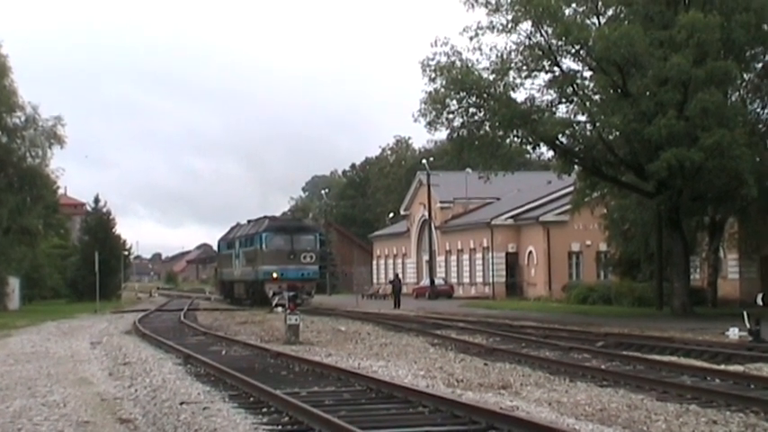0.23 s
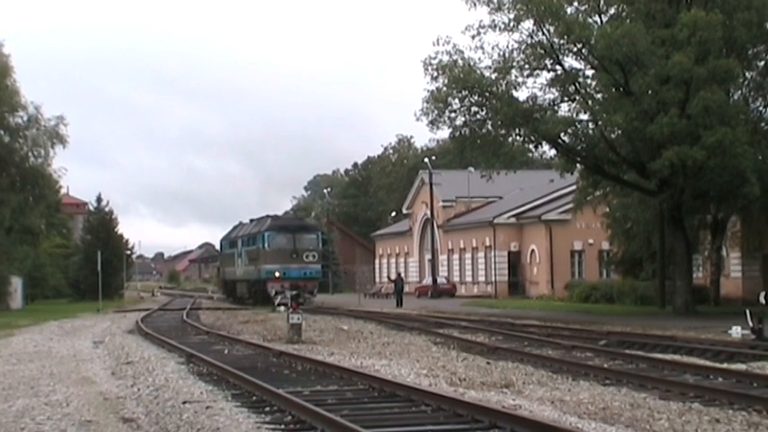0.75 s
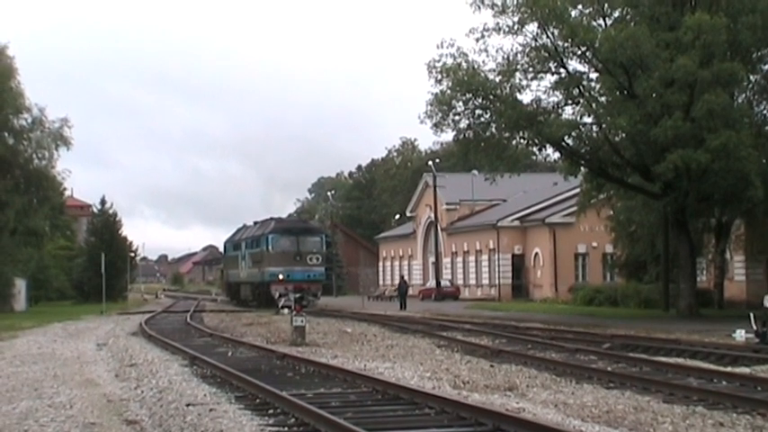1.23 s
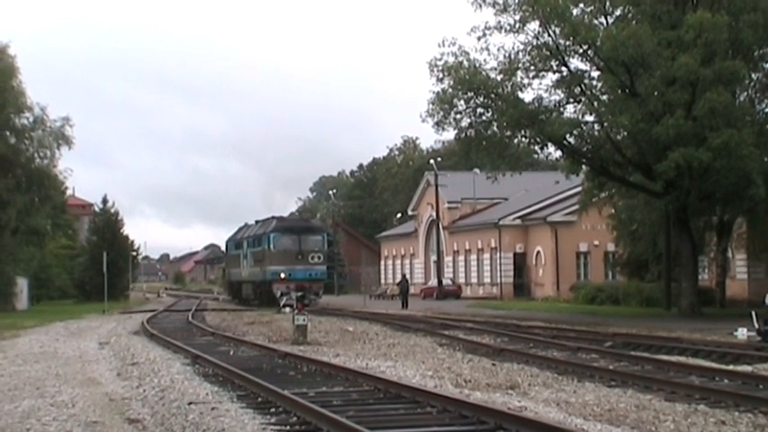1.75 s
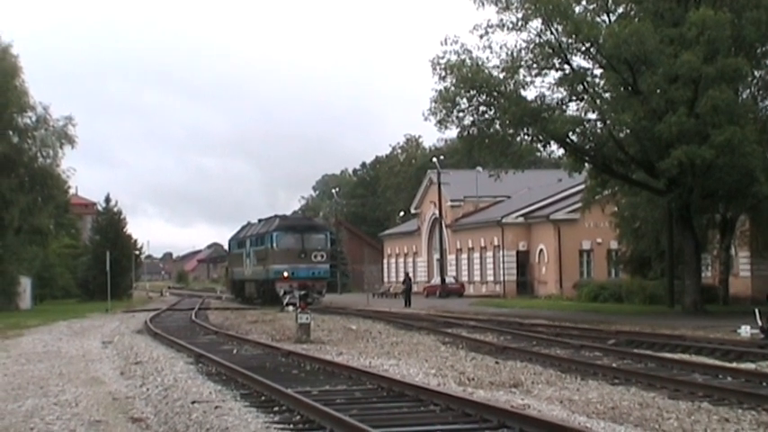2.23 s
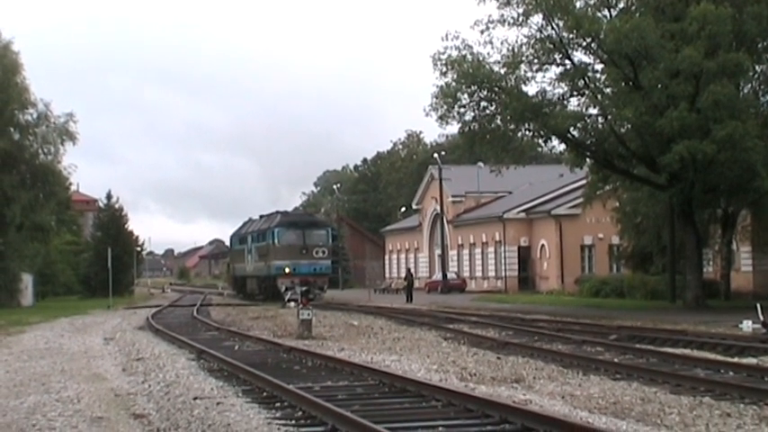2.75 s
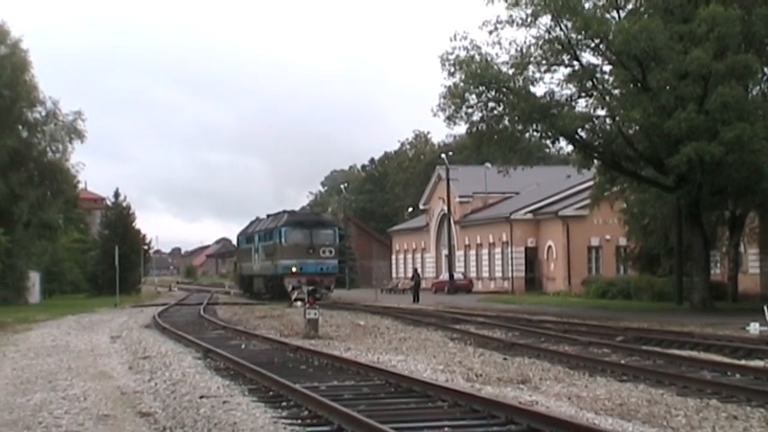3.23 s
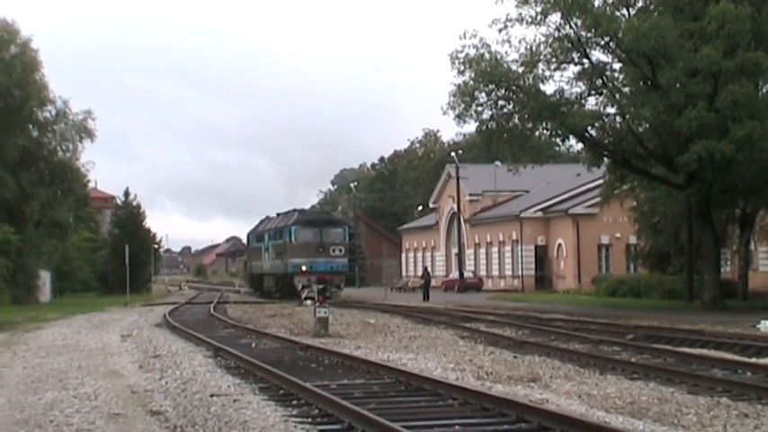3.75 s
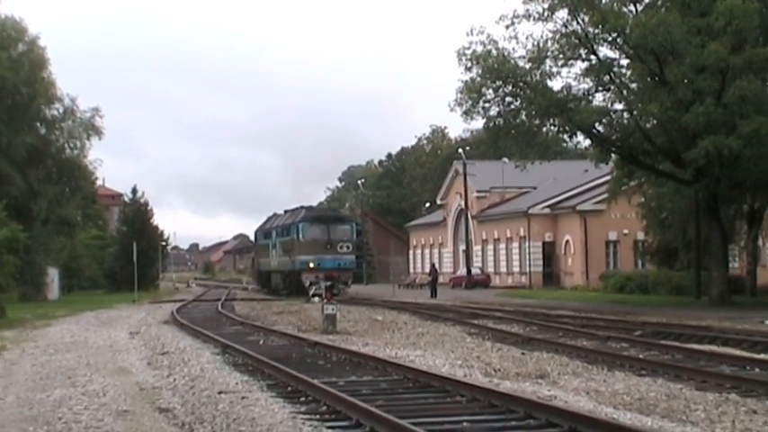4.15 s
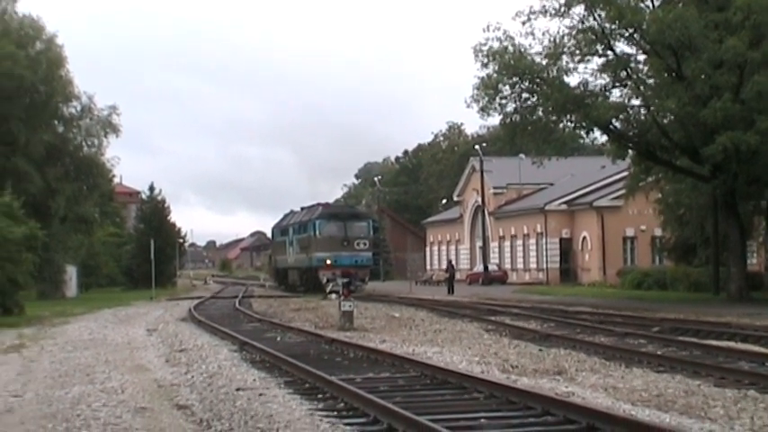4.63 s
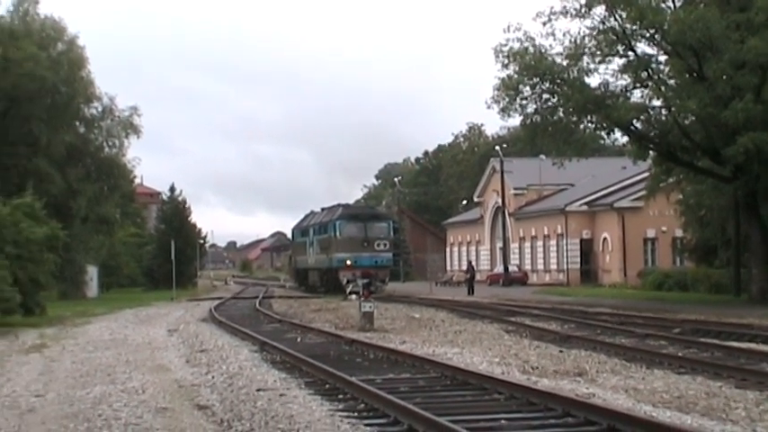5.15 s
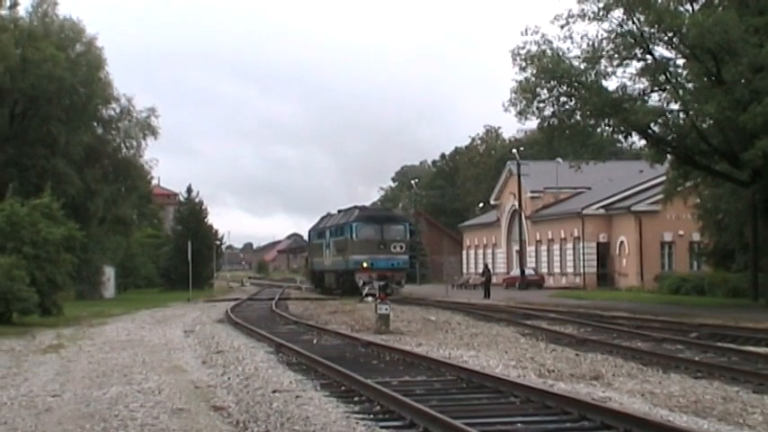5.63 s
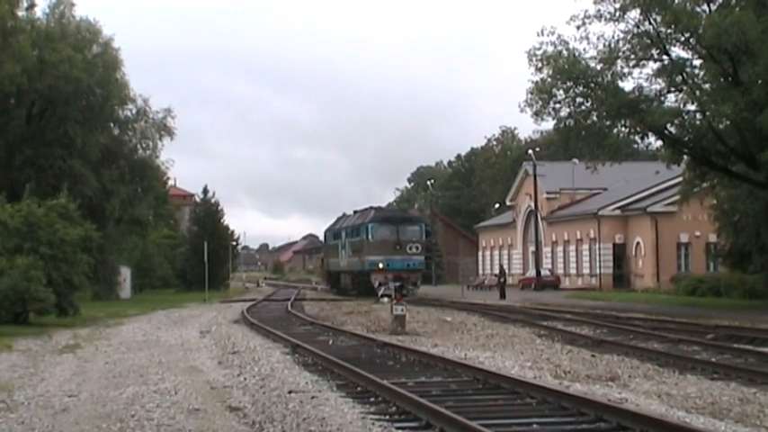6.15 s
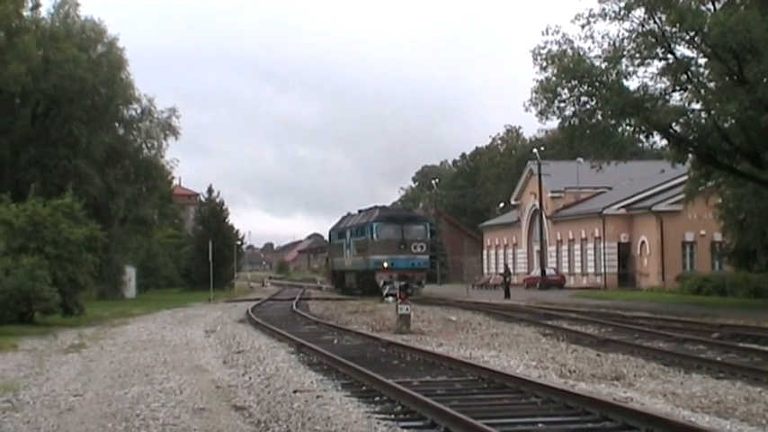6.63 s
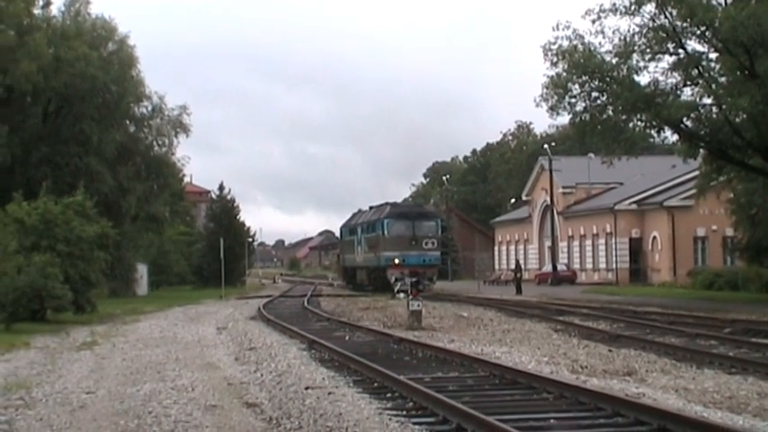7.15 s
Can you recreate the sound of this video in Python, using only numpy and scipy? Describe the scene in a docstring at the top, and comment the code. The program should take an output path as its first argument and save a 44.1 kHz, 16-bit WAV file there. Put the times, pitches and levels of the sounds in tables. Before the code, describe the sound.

A diesel locomotive idles with an uneven low throb while brake air bursts out in a loud roar, thins to a singing hiss and fades.

```python
"""Diesel train braking at a station

A sixteen-cylinder diesel locomotive idles as it rolls slowly into a country station, some way from a camcorder.
A brake valve opens: air, made of coloured noise and wavering tones, roars, sings in its pipe and fades.
Unequal pulses make the engine, gliding sines its fan, its blower and the faint squeaks of the brakes.
The camcorder adds motor whine and hiss, wind puffs add soft bumps, and the bass is spread wide.
The level dips for an instant at about 4.4 s."""
import sys
import numpy as np
from scipy import signal
from scipy.fft import rfft, irfft, next_fast_len
from scipy.io import wavfile

SR = 44100
rng = np.random.default_rng(int(sys.argv[2]) if len(sys.argv) > 2 else 0)


def unload_audio(sound):
    """Save the sound as a 16-bit wav file, at the path given as the first command line argument."""
    columns = np.transpose(np.atleast_2d(sound))
    # keep every value between -1 and 1, then stretch to whole-number steps
    steps = np.round(np.clip(columns, -1, 1) * 32767)
    wavfile.write(sys.argv[1], SR, steps.astype(np.int16))


N = 326222
T = np.arange(N) / SR
SIZE = next_fast_len(N, True)
FREQS = np.arange(SIZE // 2 + 1) * SR / SIZE


def undb(db):
    """Amplitude gain is ten to the power of decibels over twenty."""
    return 10 ** (np.asarray(db) / 20)


def unit(x):
    """Normalisation: scale to rms 1."""
    return x / np.sqrt(np.mean(x ** 2))


def curves(table):
    """Linear interpolation: the columns of a time table as signals."""
    seconds, *columns = np.transpose(table)
    return [np.interp(T, seconds, column) for column in columns]


def colour(points):
    """Spectral envelope: gain at every frequency, dB joined by straight lines over log frequency."""
    hz, db = np.transpose(points)
    return undb(np.interp(np.log(FREQS + 1), np.log(hz), db))


def band(points):
    """Band limiting: a colour that falls away beyond its first and last point."""
    below = (points[0][0] / (FREQS + 1) / 2) ** 4
    above = (FREQS / points[-1][0] / 2) ** 4
    return colour(points) / np.sqrt(1 + below + above)


def filtered(x, gain):
    """Linear filtering: multiply the spectrum by a gain per frequency."""
    return irfft(rfft(x, SIZE) * gain, SIZE)[:N]


def noise(gain):
    """Filtered white noise of the given colour, rms 1."""
    return unit(filtered(rng.standard_normal(N), gain))


def walk(rate_hz):
    """Low-pass random fluctuation, rms 1."""
    return noise(np.exp(-(FREQS / rate_hz) ** 2))


def swell(start, length):
    """Half-sine envelope: a smooth rise and fall."""
    return np.sin(np.pi * np.clip((T - start) / length, 0, 1))


def sweep(hz):
    """Phase in radians is the running integral of frequency."""
    return 2 * np.pi * np.cumsum(hz) / SR


VALVE_OPENS_S = 1.23
# the valve stays just cracked, then opens fully; each hold rounds off into its fall over the knee
CRACKED_S, OPENING_S, KNEE_S = 0.21, 0.2, 0.48


def air_level(db, cracked_db, hold_s, fall_db_per_s):
    """Reservoir discharge: the level steps up as the valve opens fully, holds, then falls steadily in dB."""
    age = T - VALVE_OPENS_S
    opening = np.clip((age - CRACKED_S) / OPENING_S, 0, 1)
    draining_s = KNEE_S * np.logaddexp(0, (age - hold_s) / KNEE_S)
    return db + cracked_db * (1 - opening) - fall_db_per_s * draining_s


def underframe(x, t60=0.15, echo_db=-10):
    """Comb-like interference: short reflections between frame and track ripple the spectrum finely."""
    echoes = rng.standard_normal(N) * np.exp(-np.log(1000) * T / t60)
    echoes = echoes / np.linalg.norm(echoes)
    return filtered(x, 1 + undb(echo_db) * rfft(echoes, SIZE))


PRESSURE_LOW_S = 4.6
SPENDING_CURVE = 1.55  # above 1, the full-pressure colour lingers before it gives way
# The slowing flow passes through the range where the pipe sings best.
BEST_SONG_START_S, BEST_SONG_LENGTH_S, BEST_SONG_DB = 4.85, 2.9, 2.5
# Levels of the three parts of the escaping air. Each holds: level in dB,
# change while the valve is only cracked in dB, hold in seconds, fall in dB per second.
ROAR_DISCHARGE = (-30.5, -2, 1.67, 7)
SONG_DISCHARGE = (-38, -2, 0.5, 1.46)
JET_DISCHARGE = (-37, -3.5, 3, 4)
# Colours of the same parts. Each row: frequency in Hz, relative density in dB per Hz.
ROAR_COLOUR = [(130, -29), (215, -8.5), (265, -44), (340, -3.5), (430, -44), (500, -10), (600, -4.5),
               (800, -1.5), (1050, -2), (1300, -1), (1520, -3), (1750, -4), (2100, -6), (2700, -13.5),
               (3900, -11), (6000, -48)]
SONG_COLOUR = [(1100, -19), (1500, -9), (1750, 1.5), (2000, -4), (2450, -6.5), (2600, -16.5), (3200, -25),
               (4000, -18)]
JET_COLOUR = [(2500, -21), (3600, -5), (4100, 0.5), (4300, 1.5), (4700, 2), (5500, 2.5), (6600, 1.5),
              (7700, -1.5), (8600, -2.5), (9800, -9.5), (11700, -16)]
# Tilt of each colour. Each holds: dB per octave at full pressure, dB per octave at low pressure.
ROAR_SLOPE = (1, -3)
SONG_SLOPE = (0.19, -0.1)
JET_SLOPE = (-2.1, -0.042)
# Resonances and notches of the vent pipe. Each row: frequency in Hz, width in Hz,
# lift at full pressure in dB, lift at low pressure in dB.
PIPE_MODES = [(625, 50, 3.5, 8), (790, 50, 1, 5), (900, 46, 5, 9), (989, 22, 2, 5), (1065, 90, 4.5, 2.5),
              (1176, 44, 3.5, 4), (1290, 60, 4, 3), (1522, 30, -2, 7), (1643, 34, 3, 9), (1695, 54, 2.5, 6),
              (1740, 18, 4.5, 8.5), (1824, 34, 3.5, 7), (1855, 28, 5, 7), (1960, 40, 1.5, 4.5),
              (2164, 44, 3.5, 1.5), (2280, 80, 3.5, 2), (2450, 110, -2, 3), (2800, 110, 5.5, -3),
              (3185, 90, 2.5, 11.5), (4135, 110, 1.5, 6.5), (4255, 80, -2, -4.5), (4522, 50, 2.5, 7),
              (4608, 26, 0, 8), (4856, 36, 4, 7), (5060, 110, 1.5, 4)]


def brake_air(flutter_db=0.5, drift_db=0.5):
    """Turbulent flow noise in a resonant pipe: falling pressure dulls the roar and rings the hiss."""
    early_pipe_db, late_pipe_db = 0, 0
    for hz, width, early_db, late_db in PIPE_MODES:
        peak = 1 / (1 + np.abs(2 * (FREQS - hz) / width) ** 4)
        early_pipe_db = early_pipe_db + early_db * peak
        late_pipe_db = late_pipe_db + late_db * peak
    octaves = np.log2(np.maximum(FREQS / PIPE_MODES[0][0], 1))  # above the lowest resonance
    spent = np.interp(T, [VALVE_OPENS_S, PRESSURE_LOW_S], [0, 1]) ** SPENDING_CURVE
    song_peak_db = BEST_SONG_DB * swell(BEST_SONG_START_S, BEST_SONG_LENGTH_S)
    parts = (
        (ROAR_COLOUR, air_level(*ROAR_DISCHARGE), ROAR_SLOPE),
        (SONG_COLOUR, air_level(*SONG_DISCHARGE) + song_peak_db, SONG_SLOPE),
        (JET_COLOUR, air_level(*JET_DISCHARGE), JET_SLOPE),
    )
    air = 0
    for shape, db, (early_slope, late_slope) in parts:
        fast = noise(band(shape) * undb(early_pipe_db + early_slope * octaves))
        slow = noise(band(shape) * undb(late_pipe_db + late_slope * octaves))
        blend = np.sqrt(1 - spent) * fast + np.sqrt(spent) * slow  # constant power
        air = air + blend * undb(db + drift_db * walk(3.7))
    valve = np.clip((T - VALVE_OPENS_S) / 0.005, 0, 1)
    return underframe(valve * air * undb(flutter_db * walk(36)))


def first_gush(db=-35, peak_s=0.046, low_hz=85, high_hz=270):
    """Pressure transient: the first slug of air leaves the valve with a dull whump."""
    age = np.maximum(T - VALVE_OPENS_S, 0) / peak_s
    low_cut = 1 + (low_hz / (FREQS + 1)) ** 8
    high_cut = 1 + (FREQS / high_hz) ** 6
    return undb(db) * age * np.exp(1 - age) * noise(1 / np.sqrt(low_cut * high_cut))


# Hollow core of the roar. Each row: time in seconds, frequency in Hz, level in dB rms.
HOWL_PATH = [(1.3, 1150, -41), (1.9, 1110, -39), (2.25, 1110, -38), (2.62, 1000, -43), (2.95, 940, -42),
             (4.6, 800, -57)]


def howl(spread_hz=150):
    """Narrow-band noise by modulation: a random envelope on a tone that sinks as the pressure falls."""
    hz, db = curves(HOWL_PATH)
    core = np.sqrt(2) * undb(db) * walk(spread_hz) * np.sin(sweep(hz))
    return (T > VALVE_OPENS_S) * core


# Whistles of the pipe. Each row: start in seconds, length in seconds, frequency in Hz, typical peak in dB.
PIPE_WHISTLES = [(5.1, 2.9, 1739, -48), (5.15, 1.8, 1823, -49), (5.3, 2.3, 1647, -49),
                 (5.5, 1.3, 1717, -49), (5.5, .35, 4150, -51), (5.7, 1.3, 1852, -49), (5.7, 1.2, 4100, -54),
                 (6.1, 1.1, 4608, -54)]


def whistles(waver=0.00201, flicker_db=1.5):
    """Flow-resonance lock-in: the weakening flow locks onto single resonances of the pipe for a while."""
    out = 0
    for start, length, hz, db in PIPE_WHISTLES:
        angle = sweep(hz * (1 + waver * walk(25.5)))
        out = out + swell(start, length) * undb(db + flicker_db * walk(10)) * np.sin(angle)
    return out


FIRST_THUMP_S = 0.188
EASING_DB_PER_S = 0.34  # the exhaust softens as the train slows
# Engine speed. Each row: time in seconds, four-stroke cycles per second.
ENGINE_SPEED = [(0, 2.885), (2.6, 2.89), (3.7, 2.975), (4.4, 2.9), (5.3, 2.89), (6.3, 2.845), (7.4, 2.88)]
# Mean pulse strength of each cylinder, in firing order, in relative dB.
CYLINDER_STRENGTH = [1.5, -3, -11, -9, -3, -16, -10, -5, -13, -9, -11, -12, -13, -7, -17, -7]
# Boom of the silencer. Each row: frequency in Hz, relative gain in dB.
SILENCER_BOOM = [(17, -24), (26, 1), (32, 5), (46, 4), (60, -4.5), (92, -20)]
# Exhaust chuff and machinery clatter. Each row: frequency in Hz, relative density in dB per Hz.
CHUFF_COLOUR = [(35, -10), (80, -7.5), (115, -10), (135, 2.5), (152, -1), (174, 2.5), (192, -1.5),
                (215, 0.5), (255, -8), (340, -6.5), (430, -17), (800, -29)]
CLATTER_COLOUR = [(200, 1), (440, -7.5), (560, 1.5), (850, 0), (1300, -4), (1900, -7), (2600, -18.5),
                  (4000, -18), (5200, -25), (9000, -42)]


def engine(boom_db=-45.5, scatter_db=1.5, chuff_db=-41.5, lope_db=0.9, chuff_lag=0.2, beat_db=0.9,
           clatter_db=-42.0, rattle_db=0.66, wander_db=0.23):
    """Periodic excitation: unequal pulses drive the silencer; firing modulates gas chuff and valve clatter."""
    cylinders = len(CYLINDER_STRENGTH)
    cycle = np.cumsum(curves(ENGINE_SPEED)[0]) / SR
    cycle = cycle - np.interp(FIRST_THUMP_S, T, cycle)
    cylinder = np.floor(cylinders * cycle).astype(int) % cylinders
    fires = np.diff(cylinder, prepend=cylinder[0]) != 0
    pulse_db = np.array(CYLINDER_STRENGTH)[cylinder] + scatter_db * rng.standard_normal(N)
    easing_db = -EASING_DB_PER_S * T
    throb = unit(filtered(fires * undb(pulse_db), band(SILENCER_BOOM))) * undb(boom_db + easing_db)
    firing = np.cos(2 * np.pi * cylinders * cycle)
    lope = np.cos(2 * np.pi * (cycle - chuff_lag))  # the chuff swells just after the thump
    chuff = noise(band(CHUFF_COLOUR)) * undb(chuff_db + easing_db + lope_db * lope + beat_db * firing)
    clatter = noise(band(CLATTER_COLOUR)) * undb(clatter_db + rattle_db * firing + wander_db * walk(10))
    return throb + chuff + clatter


# Cooling fan running up. Each row: time in seconds, frequency in Hz, typical level in dB rms.
FAN_RUN_UP = [(2.6, 58, -69), (3.2, 61, -59), (5, 63, -69), (5.6, 67, -56.5), (6.7, 69, -52)]


def fan(waver_db=2):
    """Blade tone: a low hum that climbs slowly in pitch."""
    hz, db = curves(FAN_RUN_UP)
    return np.sqrt(2) * undb(db + waver_db * walk(4.8)) * np.sin(sweep(hz))


# Blower whine running down. Each row: time in seconds, frequency in Hz, level in dB rms.
BLOWER_RUN_DOWN = [(0, 1386, -60), (4.3, 1375, -59), (5.7, 1340, -60)]


def blower(waver=0.00165, flicker_db=2):
    """Rotor tone: the engine's air blower sings thinly and sinks a little in pitch."""
    hz, db = curves(BLOWER_RUN_DOWN)
    angle = sweep(hz * (1 + waver * walk(19.4)))
    return np.sqrt(2) * undb(db) * unit(undb(flicker_db * walk(7.9))) * np.sin(angle)


# Brake shoes groaning and squeaking. Each row: start in seconds, length in seconds,
# first frequency in Hz, last frequency in Hz, peak in dB.
BRAKE_SQUEAKS = [(2.6, 1.8, 935, 918, -46), (2.82, .26, 3870, 3870, -48), (3.4, 2.7, 460, 455, -52),
                 (4.95, .9, 4855, 4855, -50), (6.48, .16, 4860, 4860, -43), (6.63, .1, 6720, 6720, -52),
                 (7.11, .13, 6950, 6100, -53)]


def squeaks(waver=0.00142):
    """Friction-excited vibration: brake shoes catch and ring for a moment, settling onto their pitch."""
    out = 0
    for start, length, first_hz, last_hz, db in BRAKE_SQUEAKS:
        left = 1 - np.clip((T - start) / length, 0, 1)
        hz = last_hz + (first_hz - last_hz) * left ** 2
        tone = np.sin(sweep(hz * (1 + waver * walk(140))))
        out = out + undb(db) * swell(start, length) * tone
    return out


# Camcorder motor whine. Each row: frequency in Hz, level alike in both channels in dB rms,
# level opposed in the channels in dB rms.
MOTOR_WHINE = [(904, -70, -61), (990, -61, -63), (1040, -61, -74), (2675, -76, -62), (2772, -74, -66),
               (3025, -72, -64), (3122, -61, -59.5), (5797, -67, -66), (5883, -64, -63), (8817, -71, -70)]
# Its hiss. Each row: frequency in Hz, relative density in dB per Hz.
HISS_COLOUR = [(100, 10), (500, 12.5), (1500, -10), (3000, 7), (5000, -5), (5850, 9), (7200, -0.5),
               (9000, 3), (10200, -7), (12000, -22)]


def motor(waver=0.00088, flicker_db=3.0, fade_db=0.6, hiss_mid_db=-59, hiss_side_db=-56,
          turn_hz=50, repeat=0.32):
    """Structure-borne sound: motor tones, and hiss partly repeating each turn; returns mid and side."""
    turns = 1 / (1 - repeat * np.exp(-2j * np.pi * FREQS / turn_hz))
    hiss_gain = band(HISS_COLOUR) * turns
    out = np.array([undb(db) * noise(hiss_gain) for db in (hiss_mid_db, hiss_side_db)])
    for hz, mid_db, side_db in MOTOR_WHINE:
        angle = sweep(hz * (1 + waver * walk(39.0)))
        tone = np.array([undb(mid_db) * np.sin(angle), undb(side_db) * np.cos(angle)])
        flicker = unit(undb(flicker_db * walk(43) + fade_db * walk(1.3)))
        out = out + np.sqrt(2) * tone * flicker
    return out


# Wind on the microphone. Each row: start in seconds, length in seconds, centre in Hz, peak in dB.
WIND_PUFFS = [(0.771, 0.078, 95, -20.5), (1.255, .11, 70, -23), (1.485, 0.059, 85, -25),
              (1.587, .12, 80, -22), (1.76, .045, 85, -23), (2.628, 0.055, 55, -20)]


def wind(spread=0.32):
    """Wind pressure fluctuation: puffs push the two capsules apart, each with a soft low bump."""
    out = 0
    for start, length, hz, db in WIND_PUFFS:
        resonance = 1 / (1 + ((FREQS / hz - 1) / spread) ** 2)
        bump = swell(start, length) * noise(resonance)
        out = out + undb(db) * bump / np.abs(bump).max()
    return out


def yard(x, t60=0.83):
    """Diffuse reflection off ballast, trees and the station front, equally strong at all frequencies."""
    echoes = rfft(rng.standard_normal(N) * np.exp(-np.log(1000) * T / t60), SIZE)
    return filtered(x, echoes / np.abs(echoes))


# Side signal against mid, for direct and for scattered sound. Each row: frequency in Hz, gain in dB.
DIRECT_WIDTH = [(32, 15), (46, 11), (72, 9), (100, 6), (135, -4), (200, -9), (400, -17), (1000, -18),
                (2000, -15), (4000, -10), (5500, -3), (7000, 0), (11500, 3)]
SCATTERED_WIDTH = [(30, -8), (90, -2), (160, -7), (400, -10), (700, -17), (2000, -17), (4000, -16),
                   (8000, -8), (11500, -6)]
# Balance of the channels. Each row: frequency in Hz, left minus right in dB.
LEFT_BALANCE = [(60, -1), (130, -3.2), (260, -1), (600, -.5), (4000, .2), (8000, -.6)]
# Its drift as the camcorder turns away to the left. Each row: time in seconds, left minus right in dB.
TURN_DRIFT = [(1.5, 0), (7, -.7)]


def scene():
    """Mid-side stereophony: close capsules put the train's direct side a quarter cycle behind the mid."""
    air = brake_air() + first_gush() + howl() + whistles()
    train = air + engine() + fan() + blower() + squeaks()
    motor_mid, motor_side = motor()
    mid = train + motor_mid
    direct_side = filtered(train, -1j * colour(DIRECT_WIDTH))
    scattered_side = filtered(yard(train), colour(SCATTERED_WIDTH))
    side = direct_side + scattered_side + motor_side + wind()
    lean = np.sqrt(colour(LEFT_BALANCE))  # half the difference to each channel
    turn = undb(curves(TURN_DRIFT)[0] / 2)
    return np.array([filtered(mid + side, lean) * turn, filtered(mid - side, 1 / lean) / turn])


# Brief dip in level: its start and end in seconds.
DIP_S = (4.439, 4.478)


def record(dry):
    """Gating and low-pass filtering: the level dips by 50 dB for an instant, and the top is cut."""
    live = (T < DIP_S[0]) | (T > DIP_S[1])
    gated = dry * np.maximum(live, undb(-50))
    top_cut = signal.ellip(10, 0.2, 70, 11750, fs=SR, output="sos")  # ripple dB, stop dB, edge Hz
    return signal.sosfilt(top_cut, gated)


dry = scene()
out = record(dry)
unload_audio(out)
```